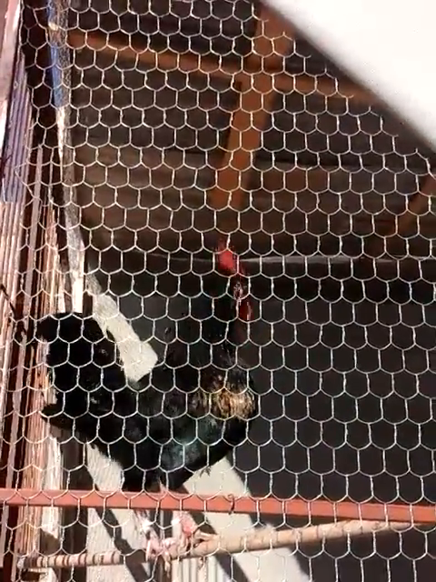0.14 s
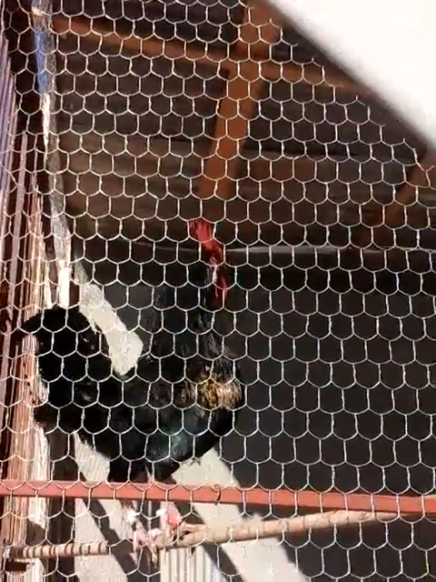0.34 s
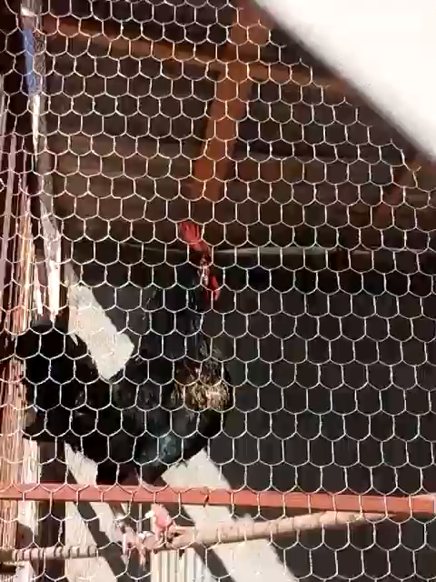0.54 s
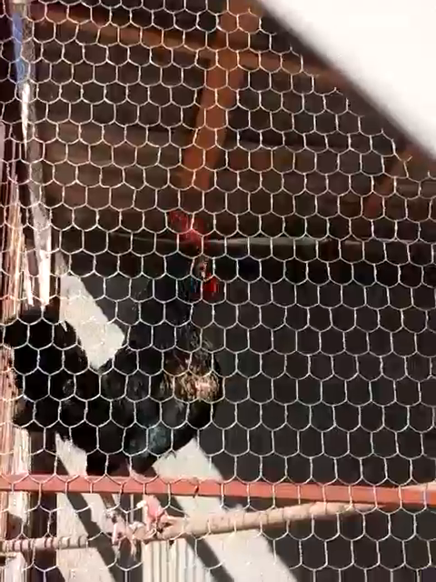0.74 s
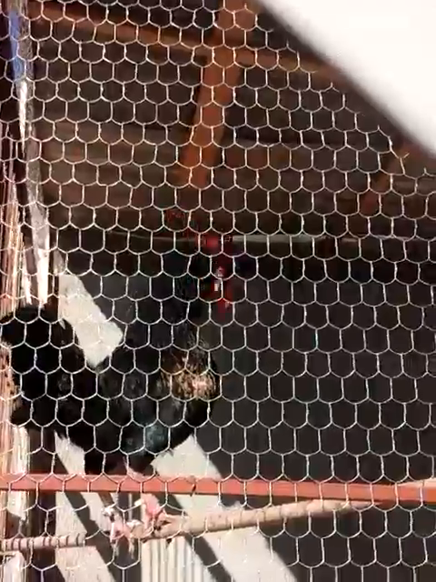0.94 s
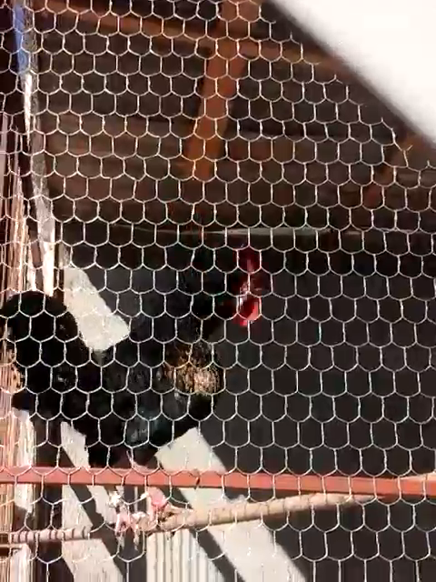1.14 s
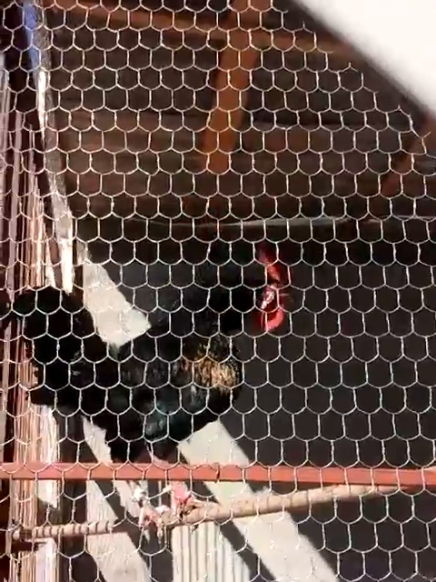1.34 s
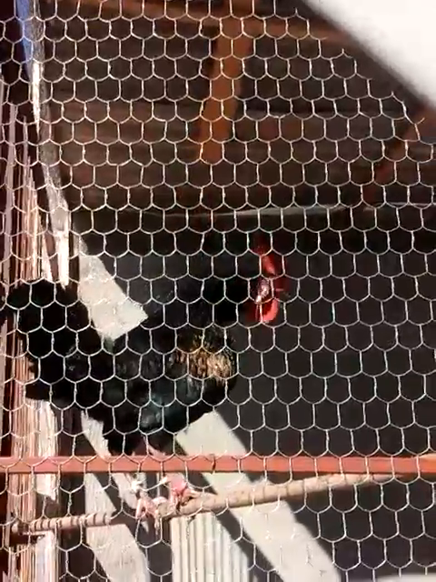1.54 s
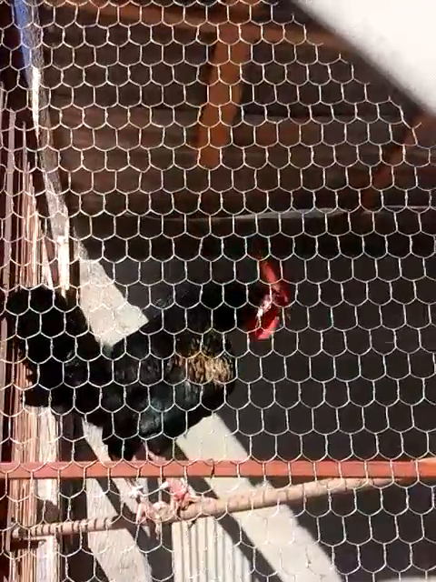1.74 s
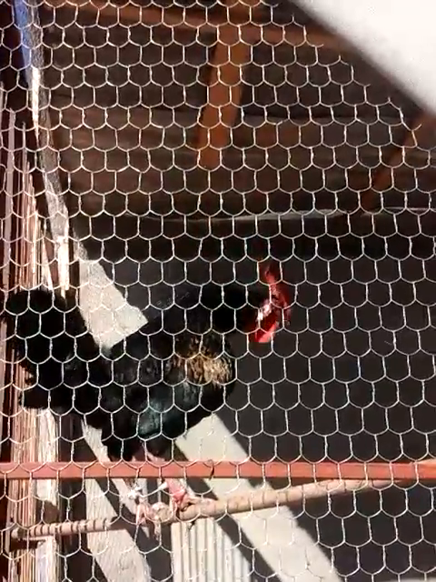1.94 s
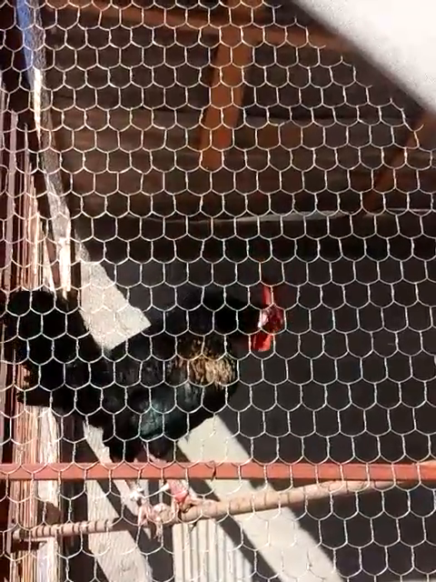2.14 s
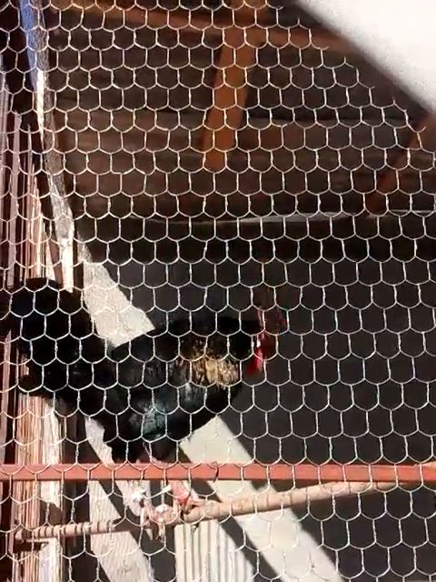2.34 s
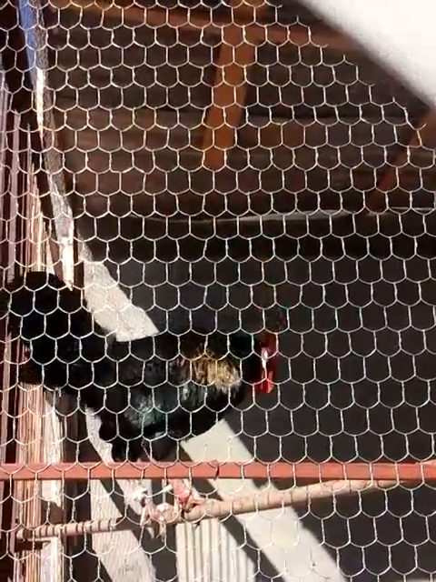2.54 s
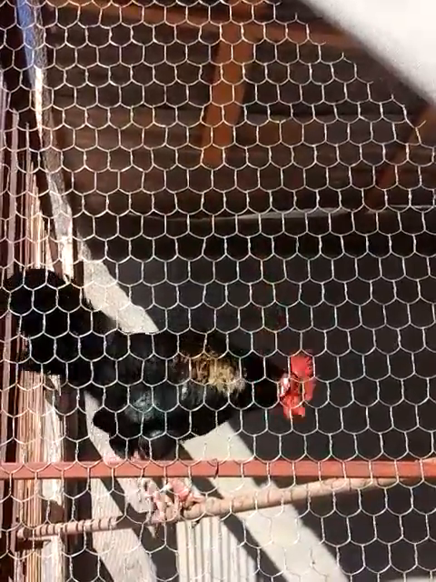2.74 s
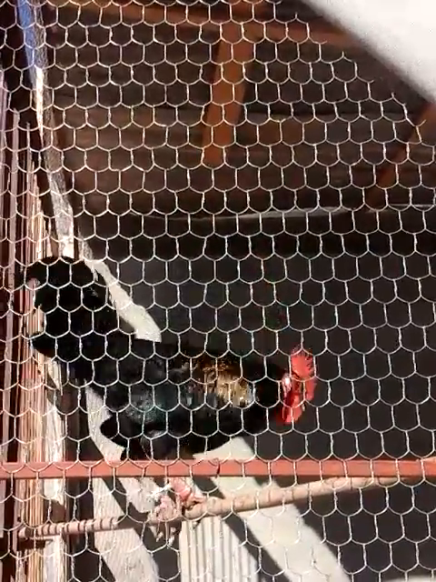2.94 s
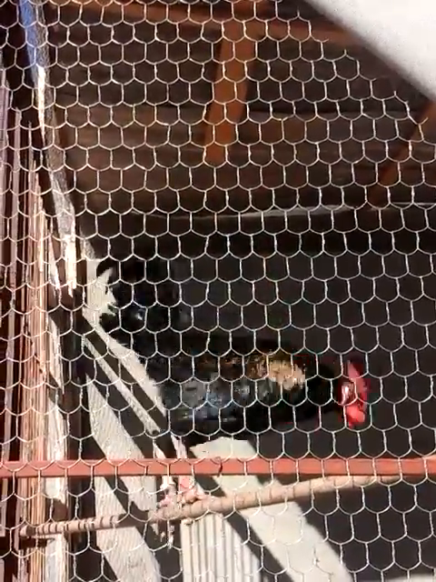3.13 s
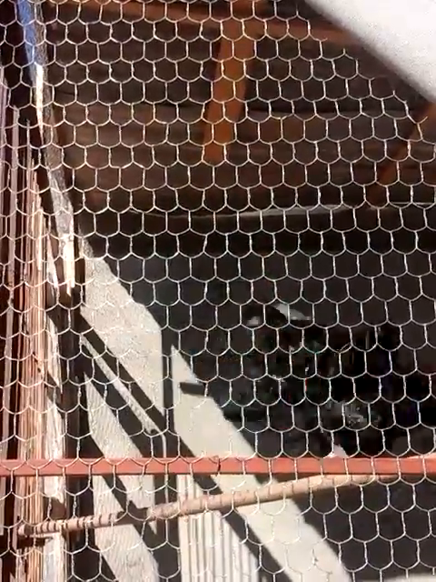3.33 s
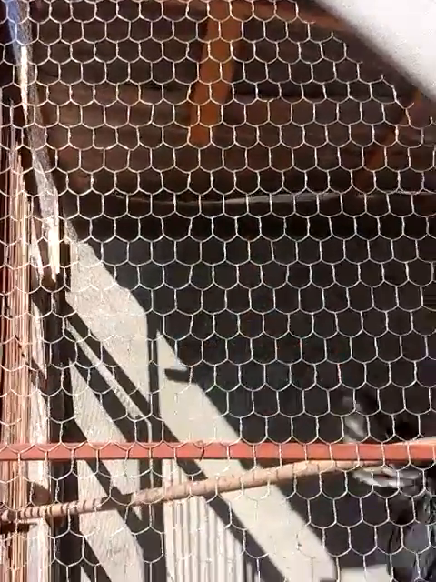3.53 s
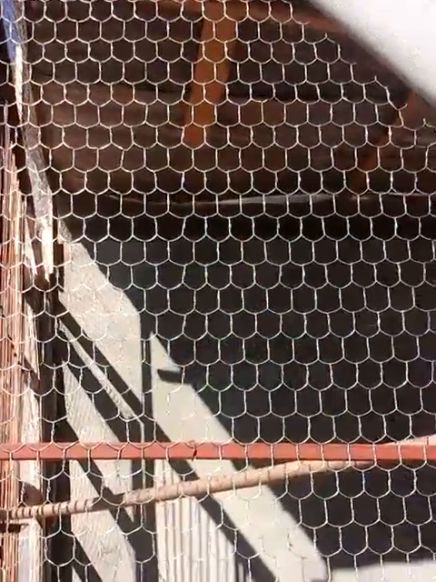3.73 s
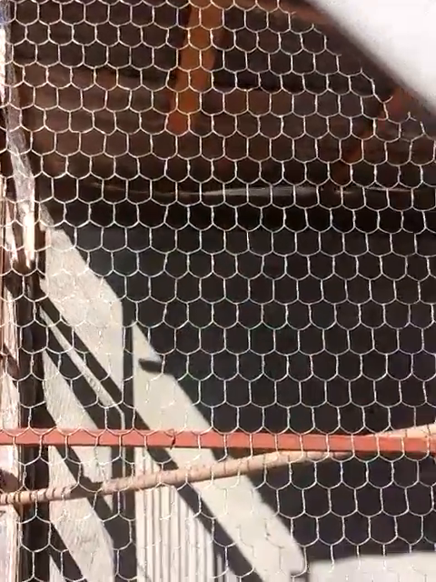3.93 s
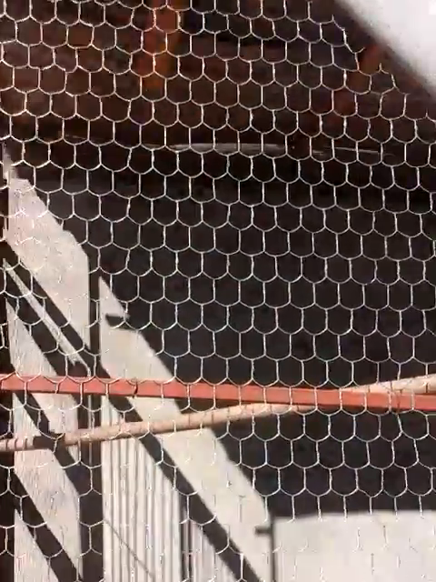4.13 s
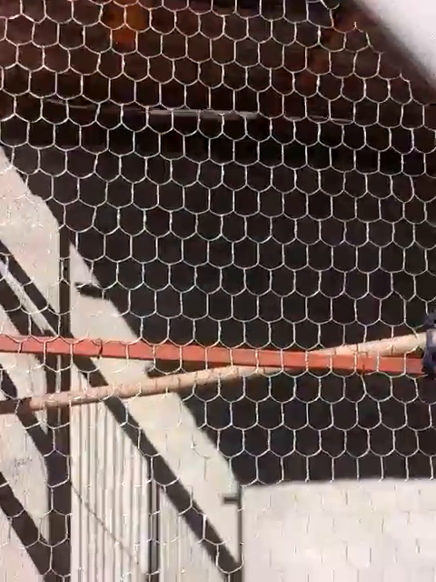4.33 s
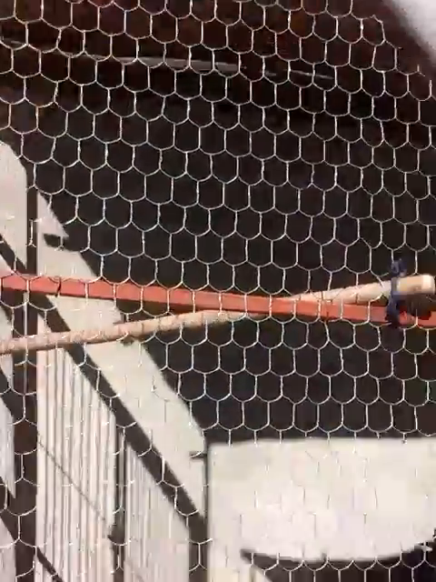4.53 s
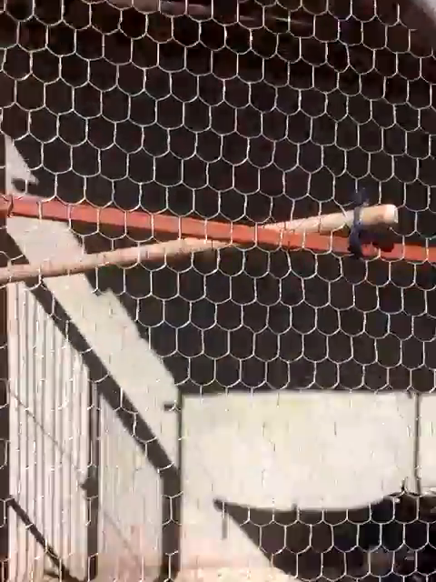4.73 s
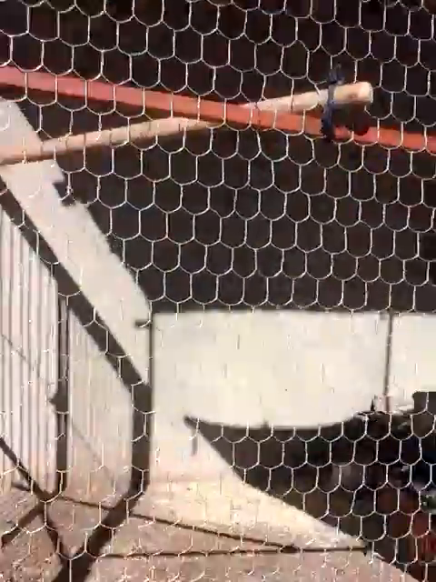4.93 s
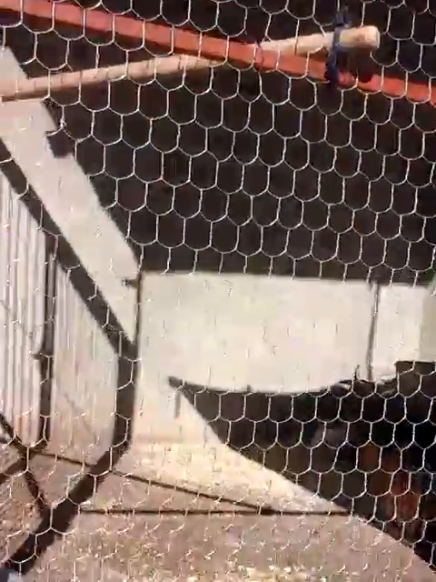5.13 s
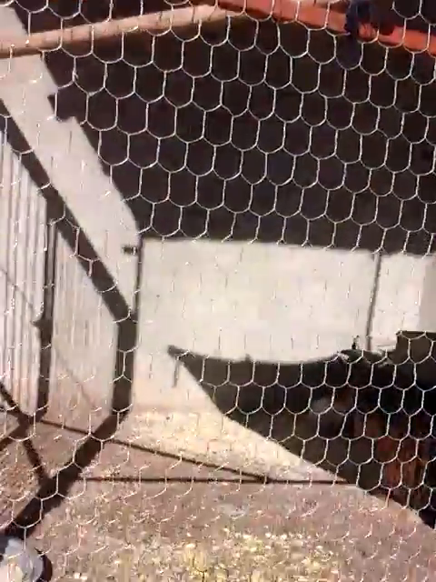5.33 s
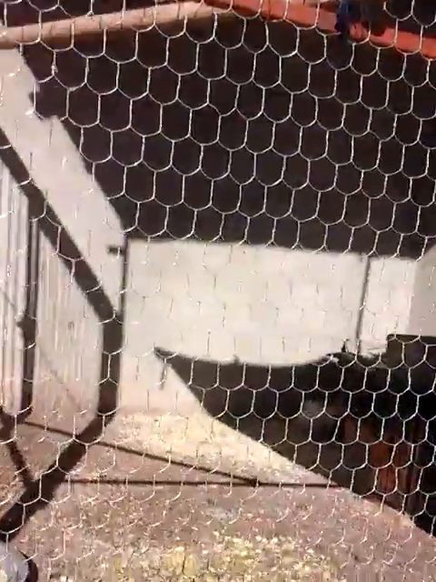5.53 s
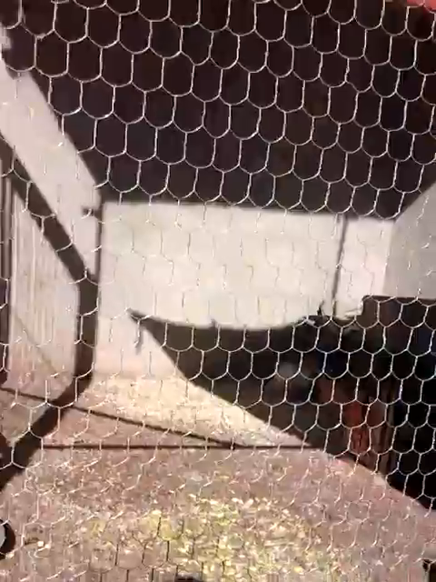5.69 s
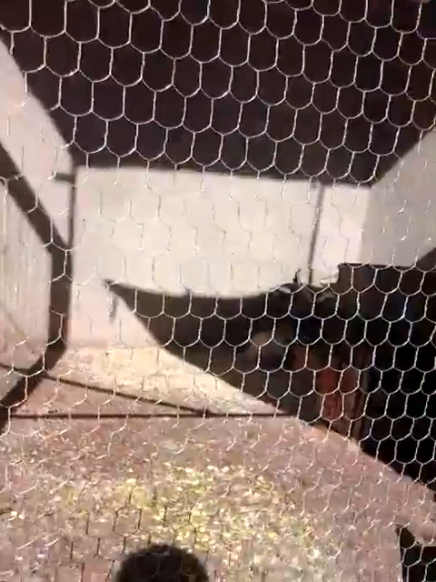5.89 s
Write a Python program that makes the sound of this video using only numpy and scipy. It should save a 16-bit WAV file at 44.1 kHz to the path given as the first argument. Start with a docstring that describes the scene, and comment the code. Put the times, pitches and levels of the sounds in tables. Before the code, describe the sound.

One long, hoarse rooster crow in a coop, followed by a low croak, a brief flutter and thud, and faint steps.

```python
"""A rooster crows once: two short syllables, a long rasp that clears into a whistle, a falling end,
then a soft croak. His voice is a source and filter: membranes in the syrinx pulse, irregularly when
forced, and throat and beak resonate. Claws tick on a metal perch and excite its modes; he flaps down,
lands with a knock, stirs the litter and steps about. The coop's boards add reflections and a short
reverberation, over the faint noise of the yard."""
import sys
import numpy as np
from scipy import signal
from scipy.fft import rfft, irfft, next_fast_len
from scipy.io import wavfile
from scipy.ndimage import uniform_filter1d, map_coordinates

SR = 44100
rng = np.random.default_rng(int(sys.argv[2]) if len(sys.argv) > 2 else 0)


def unload_audio(sound):
    """Save the sound as a 16-bit wav file, at the path given as the first command line argument."""
    columns = np.transpose(np.atleast_2d(sound))
    # keep every value between -1 and 1, then stretch to whole-number steps
    steps = np.round(np.clip(columns, -1, 1) * 32767)
    wavfile.write(sys.argv[1], SR, steps.astype(np.int16))


N = 262836


def amp(db):
    """Amplitude ratio of a level in decibels."""
    return 10 ** (np.asarray(db) / 20)


def unit(x):
    """Normalisation to rms 1."""
    return x / np.sqrt(np.mean(x ** 2) + 1e-20)


def clock():
    """Sample times in seconds."""
    return np.arange(N) / SR


def along(points, hz):
    """Interpolation of (f/Hz, value) points on a logarithmic frequency axis."""
    f, v = np.transpose(points)
    return np.interp(np.log(hz + 1), np.log(f), v)


def curves(rows):
    """Linear interpolation in time: one curve for each column after t/s."""
    times, *columns = np.transpose(rows)
    return [np.interp(clock(), times, column) for column in columns]


def noise():
    """Gaussian white noise."""
    return rng.standard_normal(N)


def wobble(rate):
    """Random modulation: a spline through `rate` knots a second."""
    return map_coordinates(noise(), [np.arange(N) * rate / SR], mode="wrap")


def swell(start, end, attack, t60):
    """Driven response: exponential approach to a steady level, then free decay."""
    t = clock()
    return (1 - np.exp(-np.maximum(t - start, 0) / attack)) * amp(-60 * np.maximum(t - end, 0) / t60)


def stroke(peak_s, rise, t60):
    """Exponential growth to a peak, then exponential decay."""
    t = clock() - peak_s
    return np.exp(np.minimum(t, 0) / rise) * amp(-60 * np.maximum(t, 0) / t60)


def hump(peak_s, width_s):
    """Gaussian envelope."""
    return np.exp(-((clock() - peak_s) / width_s) ** 2 / 2)


def cycles(pitch_hz, jitter):
    """Phase as the integral of a trembling frequency."""
    return 2 * np.pi * np.cumsum(pitch_hz * (1 + jitter * wobble(110))) / SR


def filtered(x, response):
    """Linear filtering: the spectrum times a frequency response."""
    size = next_fast_len(N + 8192)
    return irfft(rfft(x, size) * response(np.fft.rfftfreq(size, 1 / SR)), size)[:N]


def coloured(x, spectrum):
    """Spectral shaping by (f/Hz, level/dB) points, at rms 1."""
    return unit(filtered(x, lambda hz: amp(along(spectrum, hz))))


def steady(x):
    """Division by the running rms: slow level changes go, fast flutter stays."""
    power = uniform_filter1d(uniform_filter1d(x * x, size=1100), size=700)
    return x / np.sqrt(np.abs(power) + 1e-12)


def resonance(x, centre_hz, width_hz, steep):
    """Time-varying resonance whose skirts fall as detuning to the power -steep."""
    hz, t, spectra = signal.stft(x, SR, nperseg=512)
    per_frame = lambda v: np.interp(t * SR, np.arange(N), np.broadcast_to(v, N))
    detune = 2 * (hz[:, None] - per_frame(centre_hz)) / per_frame(width_hz)
    return signal.istft(spectra * (1 + detune ** 2) ** (-steep / 2), SR, nperseg=512)[1][:N]


# Background noise, which ducks during the crow and again before the wing beats: t/s, level/dB
BACKGROUND_LEVEL = [(.25, -58.5), (.55, -70.5), (1.25, -70), (2.1, -60.5), (2.65, -55.5), (3.3, -70),
                    (3.9, -56), (4.45, -64), (5.4, -61), (5.96, -73.5)]
# Spectra of the yard's four noise bands: f/Hz, relative level/dB
RUMBLE_SPECTRUM = [(20, -34), (32, -17.5), (55, -3.5), (80, -3), (130, 2.5), (200, -9.5), (300, -4.5),
                   (450, -17.5), (700, -34)]
HUM_SPECTRUM = [(120, -20.5), (175, -6), (205, 5), (235, 3), (265, -12.5), (400, -36)]
AIR_SPECTRUM = [(240, -36), (400, -2.5), (819, -3), (1200, -7.5), (1610, -6), (2250, -9.5), (3000, -16),
                (3900, -51), (6600, -120)]
RUSTLE_SPECTRUM = [(1470, -36.5), (2500, -10.5), (3040, -4.5), (3290, -3), (3970, -0.5), (4290, -5.5),
                   (6660, -16.5), (8510, -17), (9220, -18.5), (13400, -18), (14000, -15.5)]
def yard():
    """Comodulated noise: four background bands duck together, the low hum most deeply."""
    background_db, = curves(BACKGROUND_LEVEL)
    swing_db = background_db - background_db.mean()
    rumble = amp(-63 + .5 * swing_db) * coloured(noise(), RUMBLE_SPECTRUM)
    hum = amp(background_db) * coloured(noise(), HUM_SPECTRUM)
    air = amp(-65) * coloured(noise(), AIR_SPECTRUM)
    rustle = amp(-68) * coloured(noise() * amp(1.5 * wobble(200)), RUSTLE_SPECTRUM)
    return rumble + hum + (air + rustle) * amp(.36 * swing_db)


# Stirring of the litter: start t/s, end t/s, attack/s, T60/s, level/dB
LITTER_STIR = (3.5, 4, .05, 2, -58.5)
def litter():
    """Granular noise: dry litter, stirred as the bird comes down, settles slowly."""
    *envelope, db = LITTER_STIR
    grains = coloured(noise() * amp(2.3 * wobble(300)), RUSTLE_SPECTRUM)
    air = amp(-6.5) * coloured(noise(), AIR_SPECTRUM)
    return amp(db) * swell(*envelope) * (grains + air)


# One scratch in the litter: start t/s, end t/s, attack/s, T60/s, level/dB
LITTER_SCRATCH = (5.415, 5.46, .008, .6, -62)
def scratch():
    """Friction noise in a band whose centre starts high and quickly settles."""
    start, *envelope, db = LITTER_SCRATCH
    grains = noise() * amp(4 * wobble(100))
    centre_hz = 3950 + 1098 * np.exp(-np.maximum(clock() - start, 0) / .014)
    return amp(db) * swell(start, *envelope) * unit(resonance(grains, centre_hz, 1300, steep=3))


# Claws on the perch, then steps: t/s, relative level/dB, low-mode weight/dB, scrape T60/s
CONTACTS = [(2.8144, -52, -17.5, 0.019), (2.8601, -41, -27, .011), (2.9289, -44, -16, 0.015),
            (2.9628, -49.5, -20, .02), (3.0594, -43.5, -32, .022), (3.2695, -52, -24, .04),
            (3.3443, -50.5, -12, .03), (4.0206, -47, -19, .06), (4.1319, -49.5, -21, .05),
            (4.1983, -45.5, -20, 0.054), (4.2946, -50.5, -26, 0.038)]
# Modes of the metal: f/Hz, relative level/dB, T60/s
METAL_MODES = [(2263, 16, 0.07), (3020, 5.5, 0.074), (3890, 10, 0.11), (3600, 13, 0.11), (3900, 10, 0.067),
               (4680, 6, 0.043)]
def claws():
    """Modal excitation: each contact scrapes, and rings the metal differently from spot to spot."""
    out, t = np.zeros(N + SR), np.arange(SR // 4) / SR
    scrape_band = signal.butter(2, [2600, 6000], "bandpass", fs=SR, output="sos")
    for start, db, low_db, scrape_t60 in CONTACTS:
        ring = 0
        for hz, mode_db, t60 in METAL_MODES:
            struck_db = mode_db + rng.normal(0, 6.3) + (low_db + 9) * (hz < 2800)
            struck_hz = hz * (1 + rng.normal(0, .023))
            ring += amp(struck_db - 60 * t / t60) * np.sin(2 * np.pi * struck_hz * t)
        scrape = unit(signal.sosfilt(scrape_band, rng.standard_normal(len(t))))
        scrape *= amp(-60 * t / scrape_t60) + .28 * amp(-60 * t / .16)
        out[round(start * SR):][:len(t)] += amp(db - 3.5) * (.08 * ring + .65 * scrape)
    return out[:N]


# Wing beats and landing: peak t/s, thud level/dB, feather level/dB, rise/s, T60/s
WING_BEATS = [(3.605, -58.5, -52, .07, 0.128), (3.627, -38.5, -43, 0.016, 0.22),
              (3.646, -58, -39, .005, 0.12), (3.73, -52.5, -52, .06, 0.62), (3.788, -50, -46, 0.0117, 0.17),
              (3.809, -30.5, -35.5, 0.006, 0.08), (3.823, -30, -31.5, .005, 0.15),
              (3.862, -41.5, -57.5, 0.00864, 0.18)]
# Spectra of the thuds and the feathers: f/Hz, relative level/dB
THUD_SPECTRUM = [(30, -25), (70, -14), (130, -1.5), (220, 0), (380, -0.5), (550, -13), (800, -12.5),
                 (1500, -66), (4000, -55.5)]
FEATHER_SPECTRUM = [(300, -6.5), (800, 1.5), (1250, 3.5), (1700, 1.5), (3000, -0.5), (3900, 6.5), (4800, 1),
                    (6000, -7.5), (7500, -13.5), (11500, -20), (13500, -11)]
def flight():
    """Incoherent bursts add in power: wings push air and rustle, feet thud on the floor."""
    thud_power, feather_power = np.zeros(N), np.zeros(N)
    for peak_s, thud_db, feather_db, rise, t60 in WING_BEATS:
        beat = stroke(peak_s, rise, t60)
        thud_power += (amp(thud_db) * beat) ** 2
        feather_power += (amp(feather_db) * beat) ** 2
    feathers = coloured(noise() * amp(2.4 * wobble(700)), FEATHER_SPECTRUM)
    return np.sqrt(thud_power) * coloured(noise(), THUD_SPECTRUM) + np.sqrt(feather_power) * feathers


# Reverberation time under the roof: f/Hz, T60/s
COOP_DECAY = [(200, .55), (800, 1), (2000, 0.59), (5000, 0.12), (12000, .2)]
def coop(x, tail_db):
    """Reverberation: a weak diffuse tail follows the direct sound, the treble dying first."""
    hz, t, spectra = signal.stft(rng.standard_normal(SR // 2), SR, nperseg=256)
    tail = signal.istft(spectra * amp(-60 * t / along(COOP_DECAY, hz)[:, None]), SR, nperseg=256)[1]
    return x + amp(tail_db) * signal.fftconvolve(x, tail / np.linalg.norm(tail))[:N]


# Standing waves between the boards: f/Hz, bandwidth/Hz, gain/dB
BOARD_MODES = [(745, 30, 8), (872, 35, 8), (1214, 66, 1.5), (1362, 25, 4.5), (1452, 14, 1.5), (1614, 30, 3),
               (1687, 15, 1.5), (1747, 19, 6), (2240, 25, 5), (2203, 110, 4.5), (2220, 22, 5),
               (2383, 41, 7.5), (2990, 50, 3.5), (3233, 20, 8.5), (3665, 46, 7.5), (4540, 50, 0.5),
               (4750, 52, 8), (5540, 42, 1)]
def walls(x, echo_db):
    """Interference: reflections within 25 ms and standing waves make a gliding tone flutter."""
    delays = rng.integers(SR // 300, SR // 40, size=12)
    taps = np.bincount(delays, rng.choice([-1, 1], size=12))
    echoes = amp(echo_db) * signal.fftconvolve(x, taps / np.linalg.norm(taps))[:N]
    response = lambda hz: 1 + sum((amp(db) - 1) / (1 + 2j * (hz - centre) / width)
                                  for centre, width, db in BOARD_MODES)
    return filtered(x + echoes, response)


def syrinx(phase, rough, doubling, shake, hiss):
    """Forced membranes: pulse timing turns irregular, and period doubling weakens every other pulse."""
    phase = phase + shake * rough * wobble(520)
    pitch_hz = np.abs(uniform_filter1d(np.gradient(phase), size=900) * SR / (2 * np.pi))
    top_order = SR / 3 / pitch_hz
    pulses = unit(sum(np.cos(k * phase + k * k) * np.clip(top_order - k, 0, 1) for k in range(1, 27)))
    pulses *= 1 + doubling * np.cos(phase / 2) + .5 * rough * wobble(300)
    turbulence = noise() * (1 + 2 * np.cos(phase))
    return pulses + hiss * rough * turbulence


# The crow's fading tail, then the pushes of the croak: peak t/s, level/dB, rise/s, T60/s
TAIL_AND_CROAK = [(2.42, -41.5, .15, 0.88), (2.545, -34.5, 0.028, 0.19), (2.668, -38, 0.0042, 0.16),
                  (2.729, -42.5, 0.065, 0.12), (2.82, -52.5, 0.034, .12)]
# Filter of both: f/Hz, relative gain/dB
CROAK_FILTER = [(150, -59.5), (250, -18.5), (335, -11), (443, -21.5), (660, 5), (838, -20), (908, -7.5),
                (1150, -21), (1570, -33), (1790, -28.5), (2970, -31), (3620, -25), (6000, -58.5),
                (7800, -81.5), (13200, -120)]
def tail_and_croak():
    """Pulses and turbulence: the crow's tail fades into a low, hoarse croak; pitch dips and recovers."""
    pitch_hz = 320.5 + 115 * np.minimum(np.abs(clock() - 2.57), .25)
    source = syrinx(cycles(pitch_hz, jitter=.026), rough=.76, doubling=.05, shake=.51, hiss=2.2)
    power = sum((amp(db) * stroke(peak_s, rise, t60)) ** 2 for peak_s, db, rise, t60 in TAIL_AND_CROAK)
    return np.sqrt(power) * steady(coloured(source, CROAK_FILTER))


# Tones of the syrinx's other side: start t/s, end t/s, attack/s, T60/s, f/Hz, level/dB
SECOND_TONES = [(0.33, .365, 0.0071, .7, 744, -19), (0.572, .76, 0.037, 0.22, 748.6, -17.5)]
def second_side():
    """Biphonation: a second oscillator beats against the first."""
    return sum(swell(*envelope) * amp(db + .57 * wobble(50)) * np.sin(cycles(hz, jitter=.0027))
               for *envelope, hz, db in SECOND_TONES)


# Strength of the second harmonic: t/s, level over the rasp/dB
WHISTLE_COURSE = [(.53, -16.5), (.9, 3), (1.15, -9), (1.53, -2.5), (1.66, 20), (1.71, 9), (1.85, 15),
                  (1.96, 6.5), (1.99, -30.5)]
def held_tones(phase, rough):
    """Half-order tones ring until the second harmonic locks into a whistle; gives tones, lock (0-1)."""
    def tone(order, stray, flutter_db):
        return np.sin(order * phase + stray * wobble(55)) * amp(flutter_db * rough * wobble(90))

    whistling = (clock() > WHISTLE_COURSE[0][0]) & (clock() < WHISTLE_COURSE[-1][0])
    whistle_gain = amp(curves(WHISTLE_COURSE)[0]) * whistling
    locked = (whistle_gain ** 2 / (1 + whistle_gain ** 2)) ** 2
    halves = (.03 * tone(order=.5, stray=4.9, flutter_db=8)
              + 1.6 * tone(order=1.5, stray=.55, flutter_db=3.5)
              + 1.3 * tone(order=2.5, stray=.69, flutter_db=6))
    whistle = whistle_gain * tone(order=2, stray=.12, flutter_db=3)
    return whistle + amp(-4.5) * hump(peak_s=1.135, width_s=.33) * halves, locked


# Moments when the voice clears: start t/s, end t/s, roughness (0-1)
CLEAR_SPANS = [(.125, .215, .17), (.49, .535, .2), (1.615, 1.68, .07), (1.995, 2.268, .004)]
def roughness(rasp, ramp_s=.025):
    """Aperiodicity of the voice: the rasp drops away where the vibration turns regular."""
    t = clock()
    for start, end, clear in CLEAR_SPANS:
        outside = np.clip(np.maximum(start - t, t - end) / ramp_s, 0, 1)
        rasp = clear + (rasp - clear) * outside
    return np.clip(rasp, 0, 1)


# The four syllables: start t/s, end t/s, attack/s, T60/s
SYLLABLE_TIMES = [(.079, 0.21, 0.017, 0.37), (.32, 0.37, 0.011, 0.53), (.462, 1.975, .022, 0.4),
                  (1.98, 2.29, 0.013, 0.23)]
# A row per syllable: base level/dB of the low, main, upper, edge, shrill and fizz bands
BAND_LEVELS = [(-28, -15.5, -26.5, -47.5, -34.5, -47.5), (-22, -15.5, -23, -33, -51, -48.5),
               (-20, -18, -22, -33, -52, -51.5), (-30.5, -21, -30, -34.5, -29, -50)]
# A row per band: change at full strain/dB, strain exponent, envelope exponent
BAND_RESPONSE = [(-8, 0.45, 1), (1.5, 1, 0.78), (-17.5, 1.8, 0.69), (0, 1, 1.2), (24, .9, 1.2),
                 (4.5, .7, .9)]
def band_gains(strain, fizz_lag_s=.018):
    """Spectral envelope in time: six bands follow the syllables, thin and shrill under strain."""
    power = 0
    strain_db, lateness, growth = np.transpose(BAND_RESPONSE)[:, :, None]
    for (start, end, attack, t60), base_db in zip(SYLLABLE_TIMES, BAND_LEVELS):
        is_long = end - start > 1
        tension = np.interp(np.clip(clock(), start, end), clock(), np.abs(strain)) * is_long
        gain = amp(np.array(base_db)[:, None] + strain_db * tension ** lateness)
        power = power + (gain * swell(start, end, attack, t60) ** growth) ** 2
    *gains, fizz_gain = np.sqrt(power)
    return gains + [np.interp(clock() - fizz_lag_s, clock(), fizz_gain)]


# Fundamental, a list per syllable (arch, yelp, scoop into a sagging held note, fall): t/s, f/Hz
CROW_PITCH = [
    [(.08, 568), (.135, 624), (.195, 653.9), (.26, 603.8)],
    [(.325, 585.2), (.36, 813.3), (.422, 812)],
    [(.434, 583.2), (.47, 613), (.505, 729.7), (.536, 743), (.546, 843), (1.45, 819.6), (1.53, 789.4),
     (1.68, 785), (1.972, 770.6)],
    [(1.985, 619.6), (2.04, 614.8), (2.135, 576), (2.262, 531.2), (2.38, 493)],
]
# Tightening of the throat in the held note: t/s, strain (0-1)
THROAT_STRAIN = [(.55, 0), (.87, 0.3), (1.05, .6), (1.22, 0.93), (1.45, 1), (1.97, .92), (2.0, 0)]
# Formants moved by the beak's opening: t/s, main f/Hz, edge f/Hz
BEAK_FORMANTS = [(.1, 1945, 4330), (.14, 1325, 4550), (.22, 1270, 4650), (.27, 1800, 4600),
                 (.5, 1690, 4800), (.75, 1700, 4550), (1.3, 1460, 4580), (1.65, 1554, 4700),
                 (1.95, 1540, 4250), (2.06, 1340, 4550), (2.2, 1430, 3800), (2.3, 1600, 4600)]
# A row per syllable, unstrained: roughness (0-1), main formant width/Hz, upper formant f/Hz
TIMBRES = [(.48, 1450, 3260), (.5, 1300, 3380), (.72, 1430, 3408), (0.6, 920, 3530)]
# Filters of the two highest bands: f/Hz, relative gain/dB
SHRILL_FILTER = [(3600, -30), (4000, 2), (4700, -26.5), (5100, 8), (5500, 11.5), (6050, -3), (6700, -8.5),
                 (7200, -16.5), (8000, -42.5), (9000, -73)]
FIZZ_FILTER = [(5800, -43), (6500, 11), (7600, 1.5), (8300, 0.5), (9300, -0.5), (10500, -2), (14000, -10)]
def crow():
    """Source and filter: the syrinx sounds through the moving formants of throat and beak."""
    pitch_hz, = curves(np.vstack(CROW_PITCH))
    strain, = curves(THROAT_STRAIN)
    main_hz, edge_hz = curves(BEAK_FORMANTS)
    rasp, main_width_hz, upper_hz = curves(
        [(t, *timbre) for times, timbre in zip(SYLLABLE_TIMES, TIMBRES) for t in times[:2]])
    rough = roughness(rasp)
    doubling = .34 * rough ** 2
    phase = cycles(pitch_hz, jitter=.015 * (.09 + rough))
    source = walls(syrinx(phase, rough, doubling, shake=.5, hiss=.75), echo_db=-6)
    source = coloured(source, [(250, -36.5), (430, -25), (540, -24), (700, 3.5), (870, -5),
                               (1000, -3), (1200, 10.5), (2200, 5.5), (2700, -2.5), (3200, -14)])
    # High overtones lose their order long before low ones, and come in gritty bursts.
    squeal = syrinx(phase, np.tanh(.02 + 3.5 * rough ** 1.9), doubling, shake=.42, hiss=.6)
    squeal = walls(squeal * amp(6.6 * rough * wobble(280)), echo_db=4)
    low = steady(resonance(source, pitch_hz, 360, steep=3.2)) * amp(5 * rough * wobble(90))
    tones, locked = held_tones(phase, rough)
    main = steady(resonance(source, main_hz, main_width_hz - 450 * strain, steep=3.9)) + tones
    upper = resonance(source, upper_hz - 286 * strain, 596, steep=3.6)
    edge = resonance(squeal, edge_hz, 850, steep=7)
    edge_dip_db = -11 * hump(peak_s=1.01, width_s=.11) ** 2
    # The locked whistle lifts the main formant and dims the two highest bands.
    bands = [steady(low), steady(main) * amp(6 * locked), steady(upper), steady(edge) * amp(edge_dip_db),
             steady(coloured(squeal, SHRILL_FILTER)) * amp(-4 * locked),
             steady(coloured(squeal, FIZZ_FILTER)) * amp(-4 * locked)]
    voice = sum(gain * amp(2 * wobble(34.9)) * band for gain, band in zip(band_gains(strain), bands))
    return voice + second_side()


def scene():
    """Superposition: voice and movements reverberate in the coop, over the quiet yard."""
    voice = coop(crow() + tail_and_croak(), tail_db=-22.5)
    movements = coop(claws() + flight() + litter() + scratch(), tail_db=-13.5)
    return (voice + movements + yard())[None]


def record(dry, cutoff_hz=14050):
    """Band limiting: an ideal low-pass filter removes the highest treble."""
    return np.array([filtered(x, lambda hz: hz < cutoff_hz) for x in dry])


dry = scene()
out = record(dry)
unload_audio(out)
```